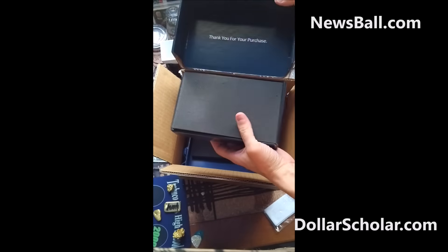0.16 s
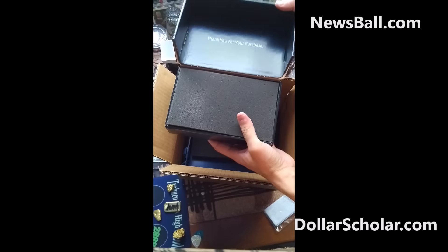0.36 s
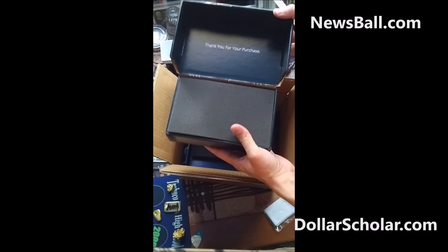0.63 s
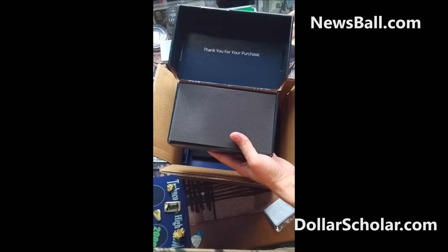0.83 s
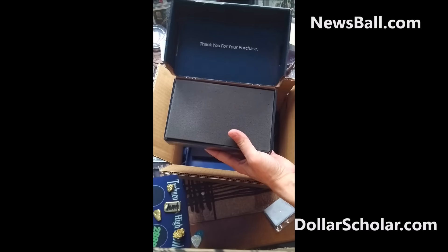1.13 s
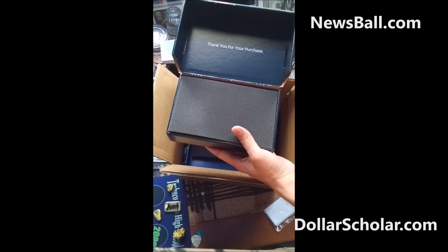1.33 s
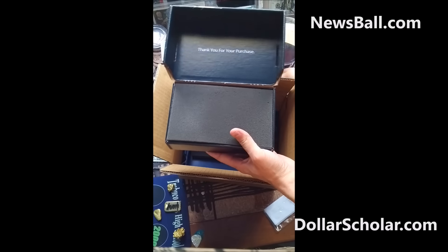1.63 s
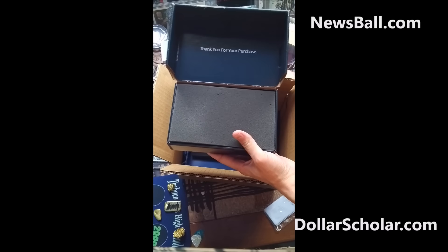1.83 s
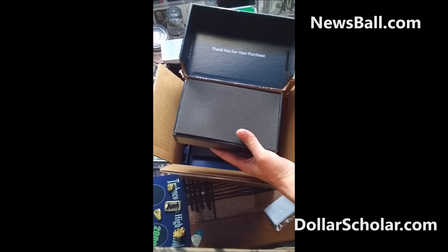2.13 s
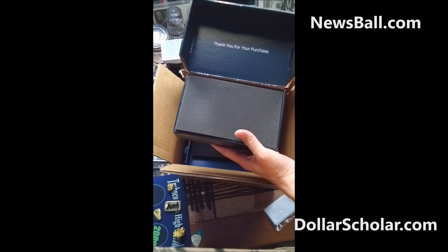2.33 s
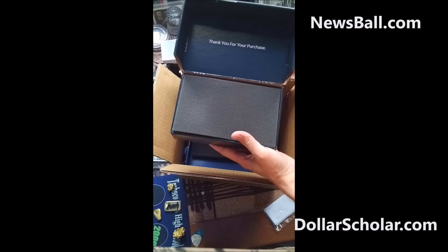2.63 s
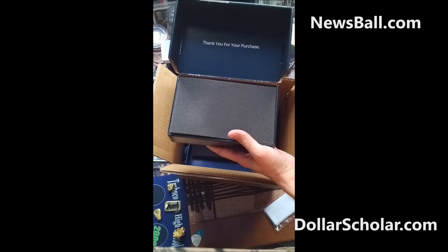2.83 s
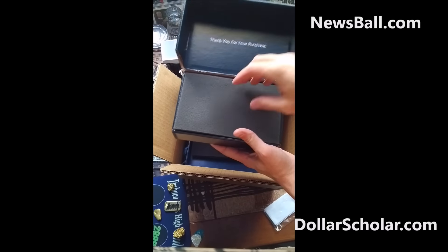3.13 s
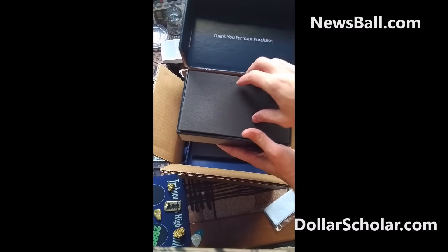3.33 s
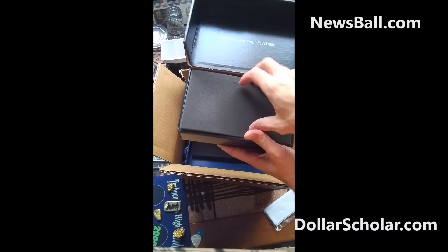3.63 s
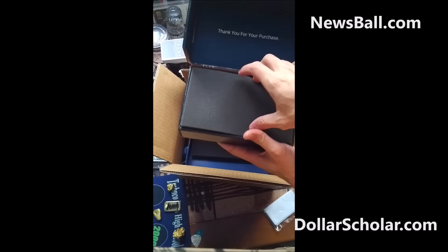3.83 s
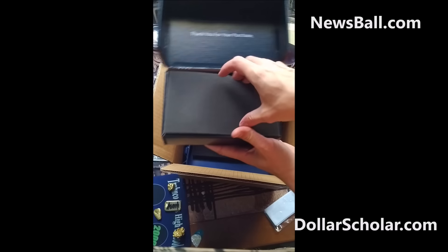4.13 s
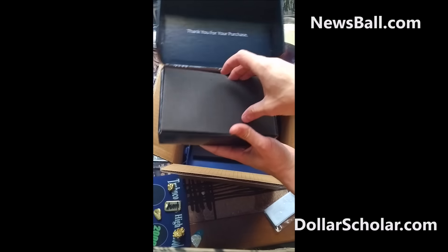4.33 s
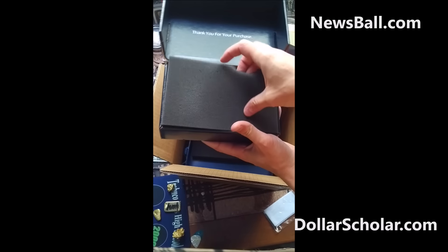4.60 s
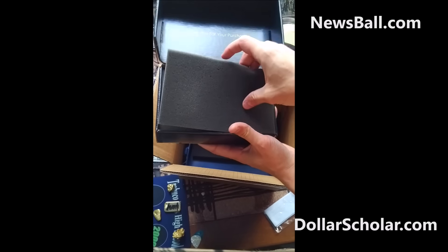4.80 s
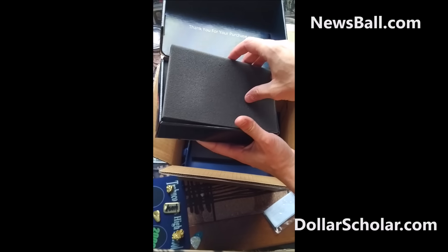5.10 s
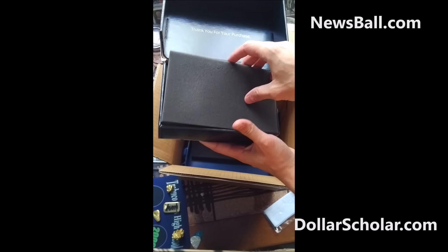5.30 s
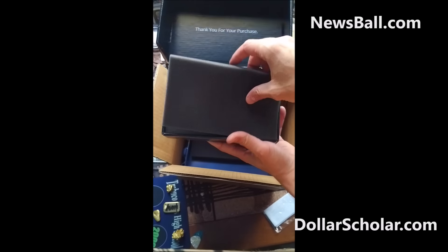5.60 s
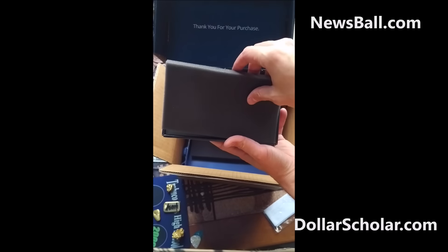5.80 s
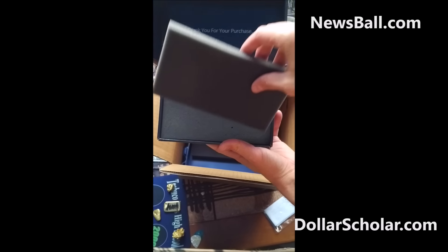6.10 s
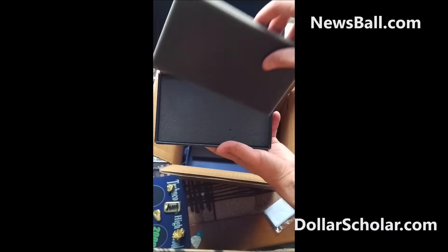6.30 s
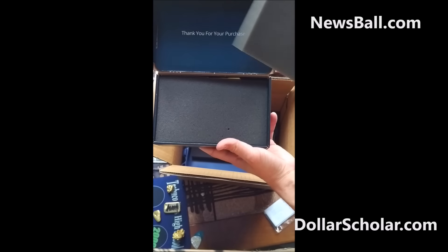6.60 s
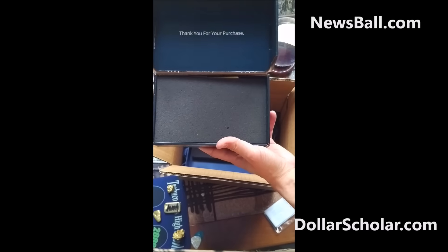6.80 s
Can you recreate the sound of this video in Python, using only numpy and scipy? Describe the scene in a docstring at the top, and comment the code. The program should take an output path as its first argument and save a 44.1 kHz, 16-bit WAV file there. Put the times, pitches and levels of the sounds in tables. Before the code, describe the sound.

A small quiet room, close microphone, with soft low-heavy air noise, a gently sagging fan hum and a very thin high electrical whine throughout. From 0 to 0.9 s, dry card rubs, small scrapes and light finger taps, with a soft bump near 0.9. Faint brushing and tiny ticks until 2 s. At 2.15 s a hard object lands with a sharp, bright, ringing clack, the loudest event; a second, duller double-contact clack follows at 2.4 s, with a small scrape between. Quiet until 3.05 s, then knocks and quick finger rubs cluster at 3.2-3.65 s. At 3.8 s the lid pops loose with a short hollow crack. Long dry sliding with low groaning scrapes runs from 4.1 to 5 s; taps at 5.15-5.4 s, a sharp rub, then softer sliding until 6.1 s. Faint brushes follow, and a small tap at 6.8 s.

```python
"""An open cardboard gift box is handled over a wooden table in a small room, close to a microphone.
Card rubs on card as random stick-slip friction; fingers chatter on it and knock it in short, damped blows.
A hard tool is put down with two sharp clacks, ringing as a sum of decaying modes; then the inner lid
pops loose, ringing the box walls, and slides off with long dry rubs. Under it lie shaped-noise room air,
a fan's sagging hum of three harmonics, and a thin electrical whine of steady lines over a pulsed buzz."""
import sys
import numpy as np
from scipy import signal
from scipy.fft import rfft, irfft
from scipy.io import wavfile
from scipy.ndimage import uniform_filter1d

SR = 44100
rng = np.random.default_rng(int(sys.argv[2]) if len(sys.argv) > 2 else 0)


def dump_mix(stems):
    """Bounce the given channels to the path in sys.argv[1] as a 16-bit WAV at rate SR."""
    frames = np.atleast_2d(stems).T  # one column per channel
    limited = np.clip(frames, -1, 1)  # hard clip at full scale
    pcm = np.round(limited * 32767).astype(np.int16)
    wavfile.write(sys.argv[1], SR, pcm)


N = 306495
TIME = np.arange(N) / SR
AFTER = TIME[:SR // 3]  # time since a blow, s
HZ = np.fft.rfftfreq(4096, 1 / SR)  # frequency grid of the filters


def amp(db):
    """Level in decibels to amplitude ratio: 20 dB is a factor of ten."""
    return 10 ** (np.asarray(db) / 20)


def evened(x):
    """Normalization to unit root-mean-square."""
    return x / np.sqrt(np.mean(x ** 2) + 1e-20)


def read(points, hz):
    """Linear interpolation of a table along a logarithmic frequency axis."""
    f, value = np.transpose(points)
    return np.interp(np.log(hz + 1), np.log(f + 1), value)


def add(mix, s, sound):
    """Superposition: a sound is summed into the mix from time s on."""
    part = mix[max(round(s * SR), 0):][:len(sound)]
    part += sound[:len(part)]


def colour(x, db):
    """Minimum-phase filtering: the phase is the Hilbert transform of the log gain, db on the grid HZ."""
    log_gain = np.log(amp(np.r_[db, db[-2:0:-1]]))
    response = np.exp(np.conj(signal.hilbert(log_gain)))
    impulse = np.fft.ifft(response).real
    return signal.oaconvolve(x, impulse)[:len(x)]


def burst(decay, first):
    """Impact excitation: a contact of size first, then decaying noise, whitened and set to unit energy."""
    rattle = rng.standard_normal(len(AFTER)) * np.exp(-AFTER / max(decay, 1e-4))
    rattle /= np.linalg.norm(rattle)
    rattle[0] = first
    power = uniform_filter1d(abs(rfft(rattle[:4096])) ** 2, size=45)
    rattle = colour(rattle, -10 * np.log10(power + 1e-6))  # inverse filter flattens the spectrum
    return rattle / np.linalg.norm(rattle)


def ring(modes):
    """Modal superposition: a struck body sounds as decaying cosines of alternating sign."""
    out = 0
    for k, (hz, db, t60) in enumerate(modes):
        out = out + amp(db - 60 * AFTER / t60) * np.cos(2 * np.pi * hz * AFTER) * (-1) ** k
    return out


def glide(start, end, rise_s=0.0077, fall_s=0.019):
    """Steady sliding: a linear onset, a constant pace and an exponential stop."""
    onset = np.clip((TIME - start) / rise_s, 0, 1)
    return onset * np.exp(-np.maximum(TIME - end, 0) / fall_s)


def swell(middle, length):
    """Transient sliding: a short stroke speeds up and slows down along a Gaussian."""
    return np.exp(-(2 * (TIME - middle) / length) ** 2)


def shifting(x, patchy_db=3.0):
    """Varying modal coupling: as the contact point wanders over the card, its resonances come and go."""
    z = signal.stft(x, SR, nperseg=512)[2]
    patches = uniform_filter1d(rng.standard_normal(z.shape), size=4, axis=0)  # over frequency
    patches = uniform_filter1d(patches, size=12, axis=1)  # over time
    return signal.istft(z * amp(patchy_db * evened(patches)), SR, nperseg=512)[1][:N]


def catches(per_s=22, size_db=26, decay=0.002):
    """Sudden stick-slip release: at random moments an edge snags and lets go with a tiny scratch."""
    snags = (rng.random(N) < per_s / SR) * rng.uniform(0.14, 1, N)
    return amp(size_db) * signal.oaconvolve(snags, burst(decay, 0.32))[:N]


def friction(rub_db=6, slips_per_s=2400, spread_db=2.0, smooth=1.0, flutter_db=0.52, pace_db=0.7):
    """Stick-slip friction: fibres slip at random under an unsteady hand; the slips drum, rasp and hiss."""
    # spectral envelope of the rub: f/Hz, gain/dB
    rub_colour = [(70, -4.5), (180, 3), (340, 8), (600, 4), (900, 1.5), (1200, 2), (1800, -3.5),
                  (3000, -7.5), (4500, -6.5), (6500, -4.5), (9000, -10.5), (15500, -19)]
    # long slides of card on card: start t/s, end t/s, then relative levels: rasp/dB, wall drumming/dB, hiss/dB
    slides = [(0.0, 0.351, -60.5, -62, -60.5), (0.683, 0.759, -59, -62.5, -58),
              (2.02, 2.132, -68.5, -65.5, -62), (4.093, 4.976, -61.5, -63, -61.5),
              (5.474, 6.104, -63, -63.5, -64.5)]
    # short pushes of the fingers: middle t/s, length/s, then relative levels: rasp/dB, drumming/dB, hiss/dB
    strokes = [(0.168, 0.2, -55.5, -60, -53), (0.417, 0.046, -54, -60, -54), (0.551, 0.034, -61, -66, -68),
               (0.816, 0.048, -64, -85, -57), (1.225, 0.14, -89, -82, -66), (1.342, 0.13, -75, -61, -84),
               (3.236, 0.012, -58, -60, -57.5), (3.4, 0.055, -57, -59, -56),
               (3.517, 0.048, -62, -53.5, -59.5), (3.583, 0.031, -51, -52, -55),
               (3.619, 0.094, -55, -65, -55.5), (3.8, 0.093, -58.5, -72, -60),
               (3.945, 0.099, -59, -62.5, -62.5), (4.05, 0.13, -68.5, -62.5, -68),
               (4.185, 0.061, -57.5, -78, -54.5), (4.332, 0.036, -66, -72, -55.5),
               (4.689, 0.037, -53.5, -55.5, -53), (4.735, 0.04, -58, -59, -51),
               (4.855, 0.065, -61, -71, -53.5), (5.298, 0.096, -59.5, -62, -67.5),
               (5.409, 0.043, -48.5, -66, -52.5), (5.554, 0.13, -80, -76, -60.5),
               (5.788, 0.13, -62, -82, -55), (6.023, 0.07, -66, -63, -59), (6.431, 0.04, -86, -70, -63),
               (6.656, 0.045, -69, -77, -60)]
    power = np.zeros((3, N))
    for start, end, *dbs in slides:
        power += amp(dbs)[:, None] ** 2 * glide(start, end) ** 2
    for middle, length, *dbs in strokes:
        power += amp(dbs)[:, None] ** 2 * swell(middle, length) ** 2
    rasp, drum, hiss = np.sqrt(power)

    slip_times = rng.random(N) < slips_per_s / SR
    slip_sizes = amp(spread_db * np.minimum(rng.exponential(1, N), 4))
    slips = slip_times * slip_sizes * rng.choice([-1, 1], N)
    grip_db = flutter_db * evened(uniform_filter1d(rng.standard_normal(N), size=500))
    hand_db = pace_db * evened(uniform_filter1d(rng.standard_normal(N), size=2200))
    grain = shifting(evened(slips) + smooth * rng.standard_normal(N))
    drive = evened(grain * amp(grip_db + hand_db))
    drive = colour(drive + catches(), read(rub_colour, HZ))

    # three bands: wall drumming below 700 Hz, hiss above 3500 Hz, rasp between
    low = signal.sosfiltfilt(signal.butter(2, 700, fs=SR, output="sos"), drive)
    high = signal.sosfiltfilt(signal.butter(2, 3500, "high", fs=SR, output="sos"), drive)
    return amp(rub_db) * (drum * low + rasp * (drive - low - high) + hiss * high)


def chatter(slips_per_s=260):
    """Resonant stick-slip: uneven slips of a dragging finger feed one resonance, a half-pitched scrape."""
    # drags of a finger: middle t/s, length/s, resonance f/Hz, width of each of two filter passes/Hz, level/dB
    drags = [(0.152, 0.14, 1130, 200, -66), (0.127, 0.035, 417, 200, -58.5), (0.178, 0.023, 350, 150, -55),
             (0.22, 0.24, 3390, 350, -68), (0.553, 0.17, 1214, 140, -71), (0.705, 0.05, 1180, 80, -65),
             (0.76, 0.021, 1156, 80, -60), (0.813, 0.047, 1160, 80, -65.5), (1.359, 0.1, 765, 260, -69),
             (2.213, 0.028, 1540, 260, -53.5), (2.276, 0.014, 1760, 260, -57.5),
             (3.956, 0.057, 980, 300, -63.5), (4.126, 0.1, 794, 200, -59.5), (4.454, 0.32, 390, 151, -62),
             (4.746, 0.32, 318, 110, -64), (5.699, 0.021, 1130, 300, -60.5),
             (6.082, 0.095, 730, 300, -65.5)]
    out = np.zeros(N)
    t = np.arange(SR // 2) / SR - 1 / 4  # time about the middle of a drag
    for s, length, hz, width, db in drags:
        slips = (rng.random(len(t)) < slips_per_s / SR) * rng.uniform(0.58, 1, len(t))
        b, a = signal.iirpeak(hz, hz / width, fs=SR)
        tone = evened(signal.lfilter(b, a, signal.lfilter(b, a, slips)))
        stroke = amp(db) * tone * np.exp(-(2 * t / length) ** 2)
        add(out, s + t[0], stroke[s + t >= 0])
    return out


def room(x, build=0.002):
    """Diffuse reverberation: dense reflections from table and near walls decay at band-dependent rates."""
    # reverberation of the room: f/Hz, t60/s
    decay_times = [(120, 0.088), (400, 0.24), (1500, 0.18), (4000, 0.19), (7000, 0.19), (12000, 0.16)]
    echoes = rng.standard_normal(len(AFTER)) * (1 - np.exp(-AFTER / build))
    hz, t, z = signal.stft(echoes, SR, nperseg=256)
    decay = amp(-60 * t / read(decay_times, hz)[:, None])
    tail = signal.istft(z * decay, SR, nperseg=256)[1]
    return signal.oaconvolve(x, tail / np.linalg.norm(tail))[:N]


def background(air_db=-66, waver=0.47, swell_db=1.0, hum_hz=117.9, sag_hz_per_s=1.12):
    """Broadband air noise and a fan's sagging harmonics; lifting the lid shifts the hum to its overtones."""
    # spectral envelope of the room air: f/Hz, gain/dB
    air_colour = [(20, -15), (38, 3), (54, 25), (75, 16), (110, 17), (170, 11.5), (240, 15), (400, 8.5),
                  (700, 5.5), (1500, -1), (3000, -5), (5000, -5.5), (7000, -4.5), (10000, -12), (13000, -4),
                  (15500, -11)]
    # orders of the fan's hum: multiple of the fundamental, level with lid on/dB, level with lid lifted/dB
    hum_orders = [(1, -68, -80.5), (2, -81, -73), (3, -85, -76.5)]
    # lifting of the lid: start t/s, end t/s
    lid_lift = (4.94, 6.4)
    air = amp(air_db) * colour(rng.standard_normal(N), read(air_colour, HZ))
    drift = evened(signal.resample(rng.standard_normal(size=24), N))  # slow wander of phase
    sway = evened(signal.resample(rng.standard_normal(size=24), N))  # slow wander of level
    angle = 2 * np.pi * np.cumsum(hum_hz - sag_hz_per_s * TIME) / SR + waver * drift
    hum = np.zeros(N)
    for k, *dbs in hum_orders:
        hum += amp(np.interp(TIME, lid_lift, dbs)) * np.sin(round(k) * angle)
    return air + np.sqrt(2) * amp(swell_db * sway) * hum


def whine(line_db=-1, comb_db=-92, pulse_hz=125.14, jitter=.000006):
    """Electrical interference: Fourier synthesis of a faint high buzz, with stronger lines on a jittery clock."""
    # single lines: f/Hz, relative level/dB
    whine_lines = [(7133, -73.5), (8511, -81), (8635, -77), (9388, -84.5), (10514, -82.5), (10761, -79),
                   (12016, -85), (14392, -87), (14944, -84.5)]
    # spectral envelope of the buzz: f/Hz, gain/dB
    buzz_colour = [(5200, -0.5), (8500, 0.5), (11000, 1), (12500, -7.5), (15500, 0.5)]
    clock = TIME + jitter * evened(signal.resample(rng.standard_normal(N // 700), N))  # jitter in s
    lines = np.zeros(N)
    for hz, db in whine_lines:
        lines += amp(db) * np.sin(2 * np.pi * (hz * clock + rng.random()))

    orders = np.arange(42, 124)  # harmonics of the pulse rate
    sizes = rng.uniform(0.36, 1.92, len(orders)) * amp(read(buzz_colour, orders * pulse_hz))
    spectrum = np.zeros(len(HZ), complex)
    spectrum[orders] = sizes * np.exp(2j * np.pi * rng.random(len(orders)))
    cycle = irfft(spectrum) * len(HZ)
    buzz = np.interp(clock * pulse_hz % 1, np.arange(len(cycle)) / len(cycle), cycle)
    return np.sqrt(2) * (amp(line_db) * lines + amp(comb_db) * buzz)


def taps(tap_db=27, thud_db=2, tick_db=3, first=0.31, contact_s=0.0043):
    """Heavy damping: knocked card gives a short thud with a tick on top; some touches ring one brief mode."""
    # knocks of fingers and lid: t/s, then relative levels: middle/dB, thud/dB, tick/dB
    knocks = [(0.124, -54, -66, -63), (0.299, -54, -71, -46), (0.538, -58, -64, -61),
              (0.679, -50, -76, -46.5), (0.757, -61, -67, -54), (0.975, -71, -65, -51.5),
              (1.75, -73, -85, -49), (1.83, -74, -74, -48.5), (2.028, -49.5, -68, -52.5),
              (3.055, -52.5, -50.5, -49.5), (3.236, -46.5, -71, -61), (3.401, -45.5, -45, -50),
              (3.414, -42, -65, -39), (3.461, -44, -92, -40.5), (3.47, -44, -87, -39.5),
              (3.583, -37, -41, -48), (3.594, -56, -46, -41), (3.625, -40, -54, -40),
              (4.11, -57, -51.5, -60), (5.162, -40, -53, -44.5), (5.245, -50, -53, -62),
              (5.3755, -41.5, -47, -64), (5.696, -47, -59, -66), (6.805, -48.5, -62, -54)]
    # spectral envelope of a knock: f/Hz, gain/dB
    tap_colour = [(40, -5), (120, 2.5), (250, 14.5), (450, 0.5), (800, 2.5), (1300, -6), (2500, -12.5),
                  (4000, -14), (6500, -12.5), (9000, -18), (15500, -29)]
    # light touches, from a soft bump to a tiny tink: t/s, level/dB, f/Hz, t60/s, rise time/s
    pings = [(0.8827, -37.5, 218, 0.048, 0.0019), (3.404, -46, 228, 0.046, 0.002),
             (3.592, -33, 195, 0.035, 0.0015), (3.7885, -31, 785, 0.018, 0.00082),
             (5.3763, -48, 327, 0.045, 0.0005), (6.8055, -43, 920, 0.015, 0.0005),
             (6.8365, -44, 5790, 0.013, 0.0005)]
    out = np.zeros(N)
    for s, db, low_db, high_db in knocks:
        blow = read([(350, low_db + thud_db), (900, db), (2000, db), (5000, high_db + tick_db)], HZ)
        add(out, s, amp(tap_db) * colour(burst(contact_s, first), blow + read(tap_colour, HZ)))
    for s, db, hz, t60, rise in pings:
        add(out, s, ring([(hz, db, t60)]) * (1 - np.exp(-AFTER / rise)))
    return out


def clacks(ring_db=-35, colour_db=11, first=0.18):
    """Hard impact: brief contacts excite a wide band, rattle, and ring the modes of tool and table."""
    # contacts of tool and table: t/s, relative level/dB, bass/dB, treble/dB, rattle decay/s, relative ring/dB
    contacts = [(2.1547, -9, -6.5, 1.5, 0.0043, -5), (2.4047, -16.5, -5, 0.5, 0.0044, -17),
                (2.4063, -18.5, 8, -8, 0.0078, -2), (2.4214, -11.5, 4, -9.5, 0.0033, -1.5)]
    # modes of tool and table: f/Hz, relative level/dB, t60/s
    tool_modes = [(135, -13, .2), (265, -13, .15), (340, -13, .15), (515, -7, .13), (592, -9, .13),
                  (1110, -7, .1), (1577, -1, .13), (1822, -2, .14), (1981, -4, .13), (2260, -7, .12),
                  (2620, -3, .12), (3456, 0, .15), (3660, -4, .13), (3797, -2, .14), (4010, -3, .14),
                  (4970, -3, .15), (5455, -5, .13), (5863, -8, .14), (6335, -8, .17), (6710, -7, .15)]
    # spectral envelope of the crack: f/Hz, gain/dB
    clack_colour = [(30, -23), (90, -43), (130, 6.5), (200, -6.5), (270, -2.5), (400, -2.5), (800, -2.5),
                    (1600, 4), (2200, 2.5), (2700, 2), (3700, 5), (4400, -0.5), (6500, 0), (8000, -5.5),
                    (11000, -15), (15500, -29)]
    out = np.zeros(N)
    for s, db, bass_db, treble_db, rattle, own_ring_db in contacts:
        crack = amp(colour_db) * colour(burst(rattle, first), read(clack_colour, HZ))
        hit = crack + amp(ring_db + own_ring_db) * ring(tool_modes)
        tilt = read([(450, bass_db), (1500, 0.016), (3300, 0.0093), (6500, treble_db)], HZ)
        add(out, s, amp(db) * colour(hit, tilt))
    return out


def pop(crack_db=26, decay=0.0049, first=0.16):
    """Sudden release: the tight lid lets go with a crack and excites the modes of the box walls."""
    # modes of the box walls: f/Hz, relative level/dB, t60/s
    box_modes = [(180, 0, 0.035), (215, -1, 0.06), (255, 2, 0.065), (345, 4, 0.05), (420, 0, 0.045),
                 (710, 5, 0.045), (900, -2, 0.035), (1200, 3, 0.03)]
    # spectral envelope of the crack: f/Hz, gain/dB
    pop_colour = [(40, -9), (100, 12), (250, -9), (700, 12), (1150, 9), (2000, 9), (3000, -11),
                  (4200, -8.5), (5700, 6.5), (7000, 4), (8200, 0), (9500, -19), (11500, -3.5), (15500, -18)]
    # release of the lid: t/s, relative level/dB
    release = (3.7958, -37)
    s, db = release
    out = np.zeros(N)
    crack = amp(crack_db) * colour(burst(decay, first), read(pop_colour, HZ))
    add(out, s, amp(db) * (ring(box_modes) + crack))
    return out


def scene(tool_wet_db=-3, box_wet_db=-8):
    """Direct-to-reverberant ratio: the box is near and dry, the tool farther off with more of the room."""
    tool = clacks()
    box = taps() + pop() + friction() + chatter()
    reflections = room(amp(tool_wet_db) * tool + amp(box_wet_db) * box)
    return (tool + box + reflections + background())[None]


def record(dry, port_hz=6350, port_width_hz=850, port_db=9, edge_hz=15850):
    """Port resonance: the microphone port lifts the treble; electronics add whine; a low-pass limits the band."""
    port_gain_db = port_db / (1 + ((HZ - port_hz) / port_width_hz) ** 2)
    heard = colour(dry[0], port_gain_db) + whine()
    low_pass = signal.firwin(511, edge_hz, window=("kaiser", 9), fs=SR)
    return signal.oaconvolve(heard, low_pass, "same")[None]


dry = scene()
out = record(dry)
dump_mix(out)
```